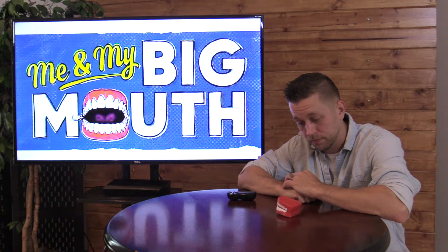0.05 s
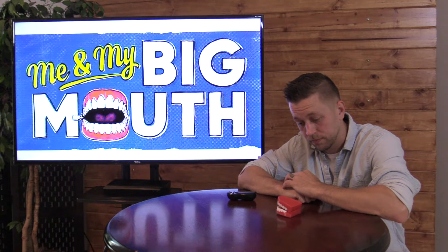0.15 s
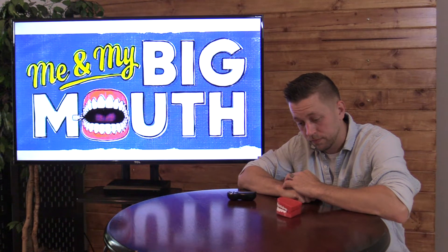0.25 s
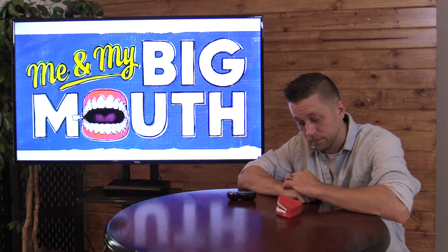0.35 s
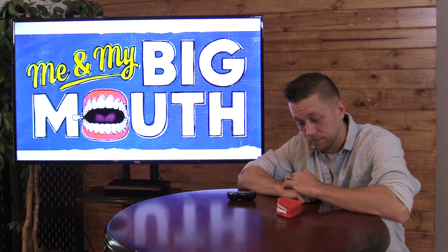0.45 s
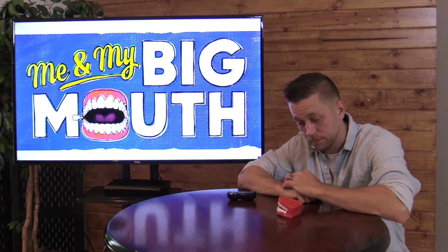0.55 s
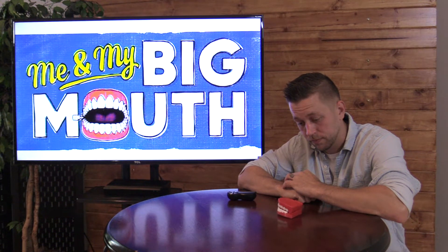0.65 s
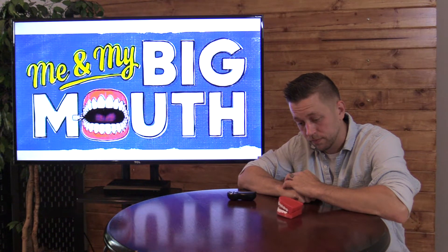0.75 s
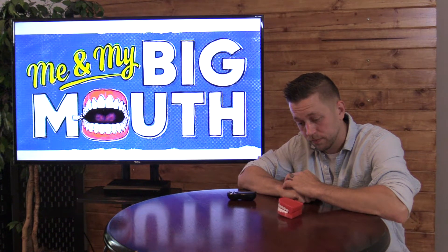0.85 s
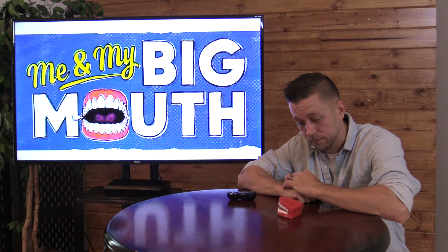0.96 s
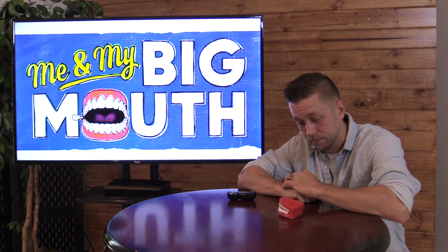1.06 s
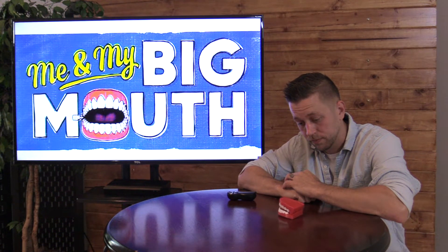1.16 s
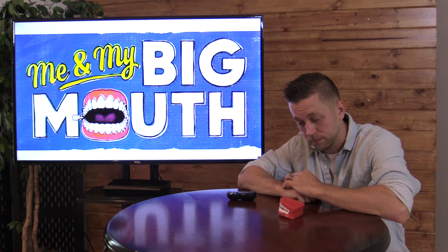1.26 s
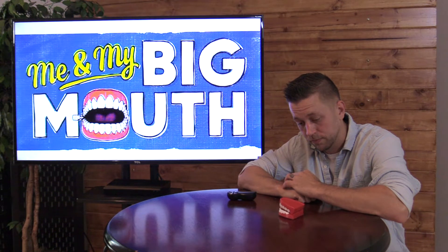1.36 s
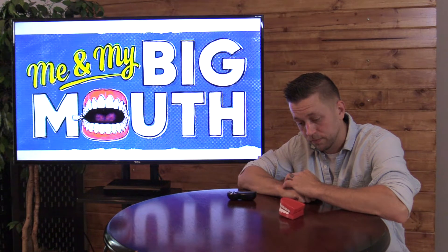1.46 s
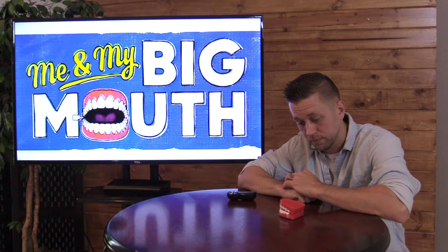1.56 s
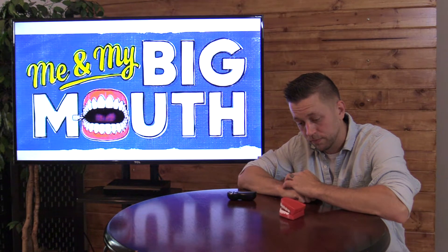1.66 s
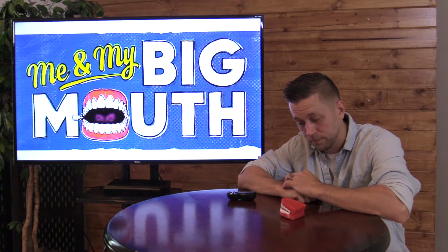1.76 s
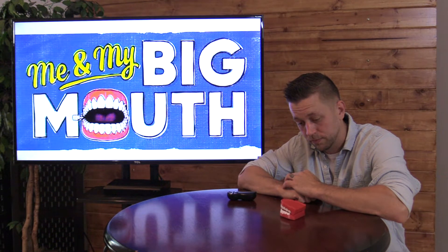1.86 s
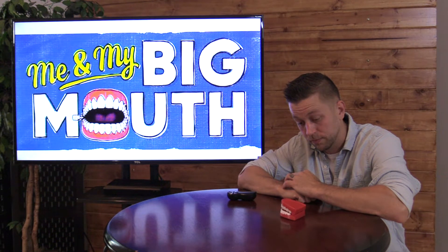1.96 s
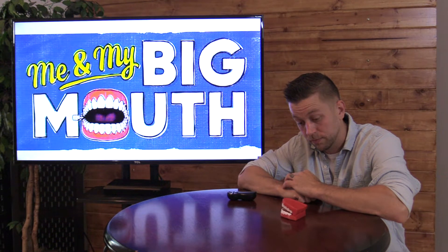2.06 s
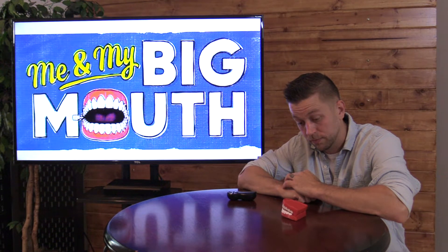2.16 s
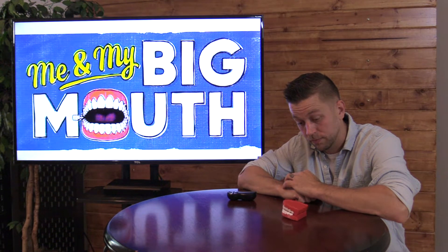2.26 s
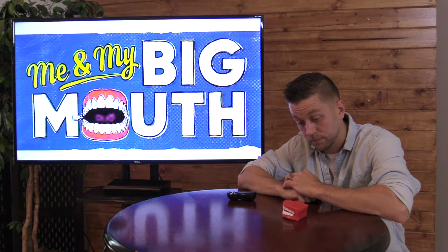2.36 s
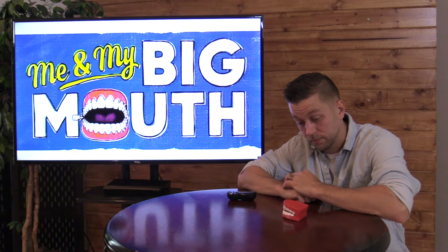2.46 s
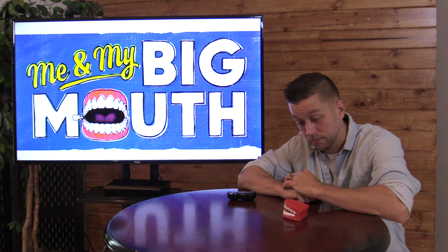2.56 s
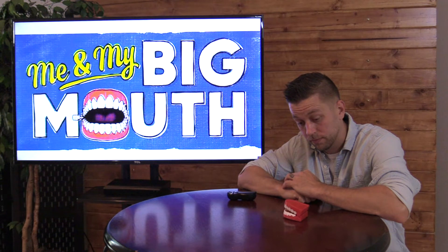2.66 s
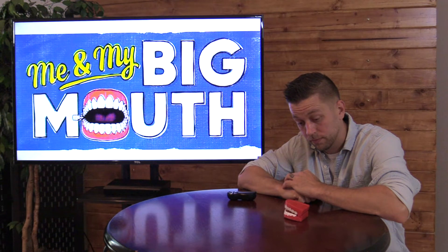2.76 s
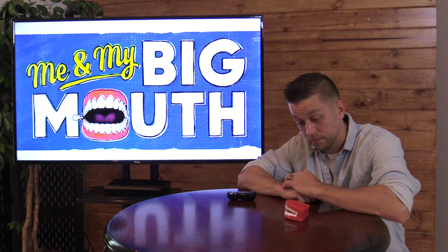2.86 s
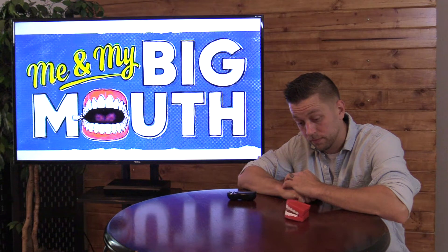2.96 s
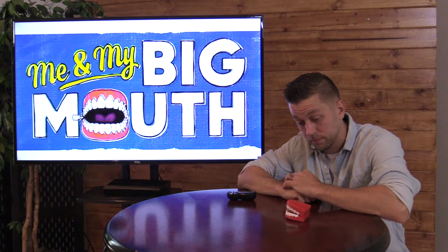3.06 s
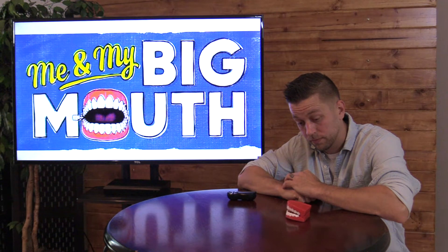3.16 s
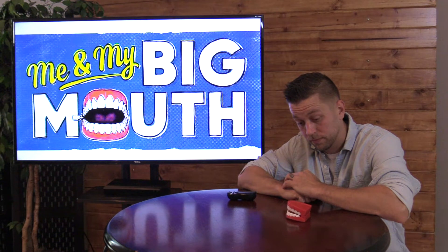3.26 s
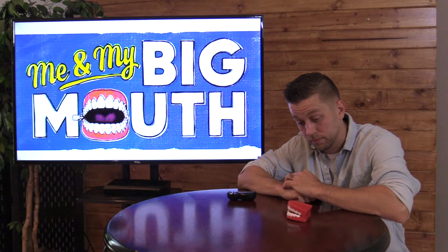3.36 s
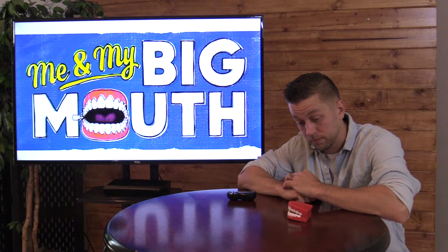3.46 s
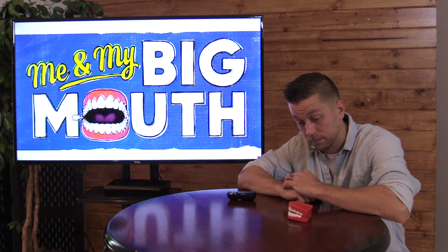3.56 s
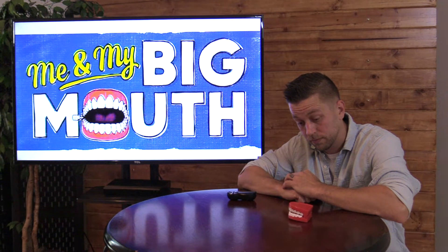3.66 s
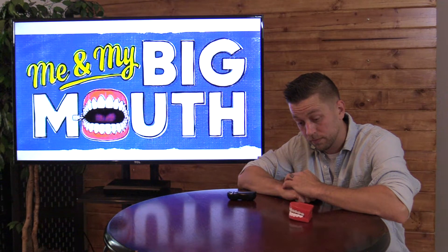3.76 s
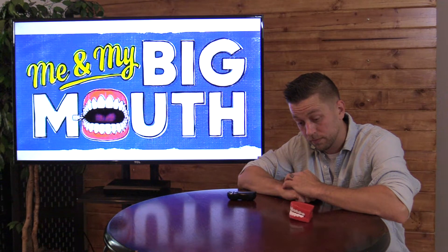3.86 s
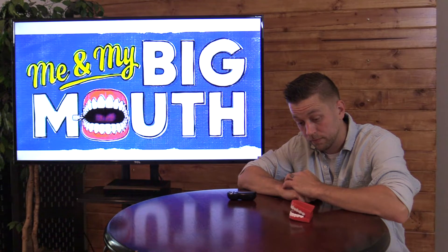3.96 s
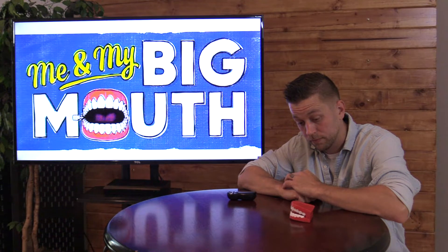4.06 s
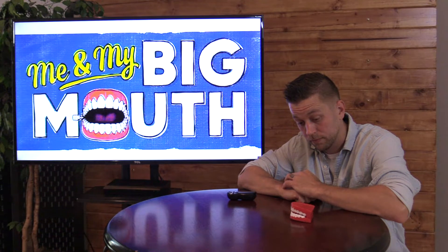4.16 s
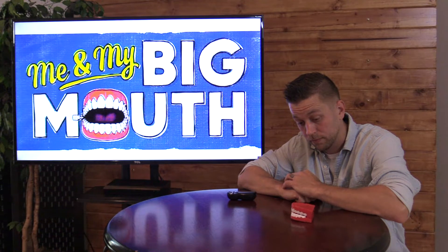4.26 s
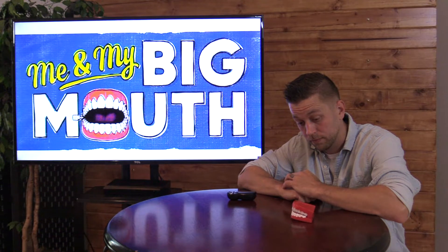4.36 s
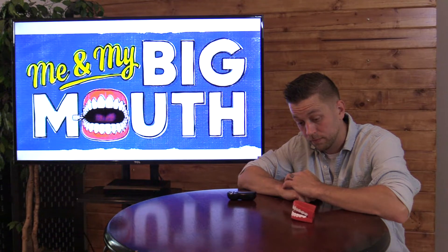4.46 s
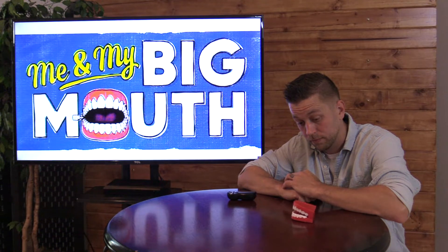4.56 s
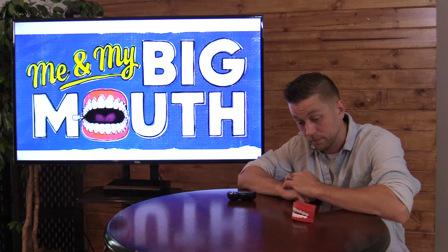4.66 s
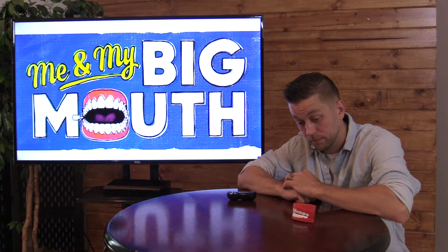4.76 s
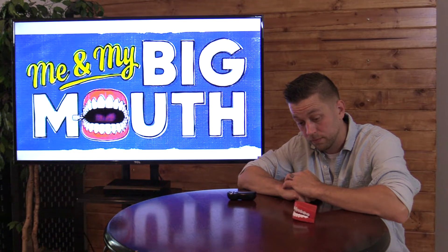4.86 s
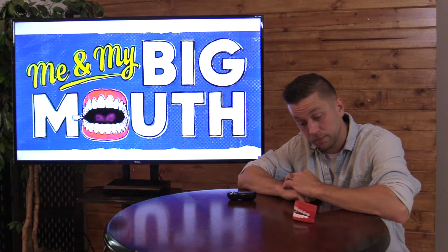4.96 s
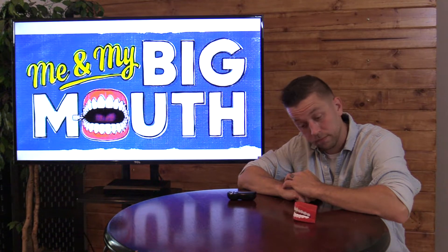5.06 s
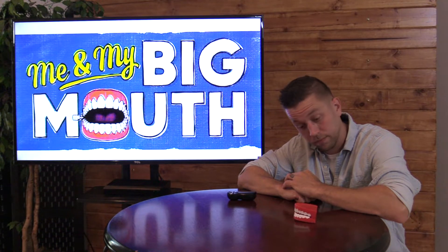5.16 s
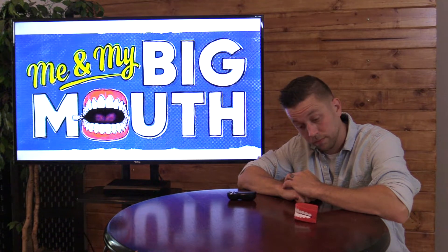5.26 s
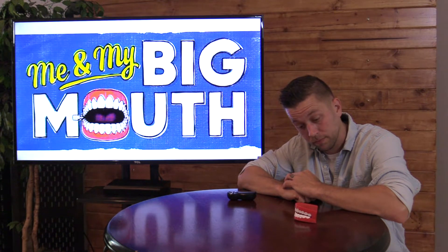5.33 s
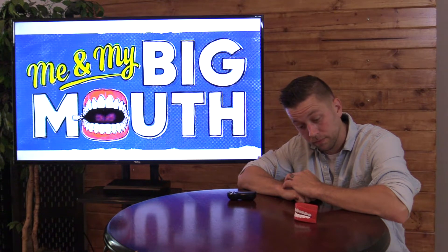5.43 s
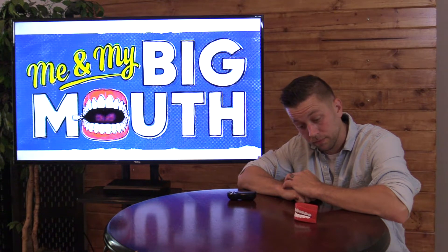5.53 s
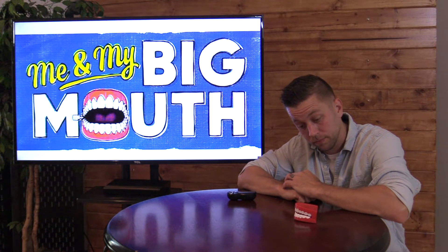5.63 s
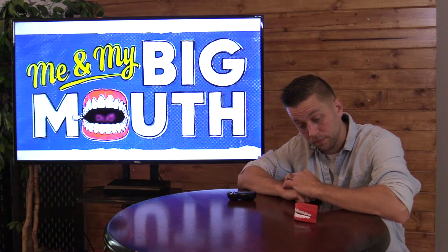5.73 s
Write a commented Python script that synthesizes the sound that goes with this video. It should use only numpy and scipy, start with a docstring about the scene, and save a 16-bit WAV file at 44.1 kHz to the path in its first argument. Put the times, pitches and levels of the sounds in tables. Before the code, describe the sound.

A small wind-up plastic jaw is already chattering on a wooden tabletop at 0 s, at around fifteen bites a second, a dense, brittle clatter. Every turn has the same pattern: a faint catch of the mechanism, a light scraping tick as the jaw slips, then about 15 ms later a sharp, hollow clack as the teeth bite shut, followed by a weak bounce on the table. The bites vary in force, some snappy, others duller with more woody thump. By 2 s the pace has dropped to about twelve a second; from 3 s it is near ten, the gaps opening and the slip ticks growing fainter. By 4 to 5.3 s it runs at about eight a second, each clack distinct, without coming to a full stop. The sound is close, midrange and bright with little bass; a large room answers quietly with a dull, blurred tail under one second long.

```python
"""Wind-up chattering jaw

A wind-up plastic jaw chatters on a wooden table, slower as its spring runs down. In each turn the cam catches
the jaw and lifts it, lets it slip, the teeth bite shut and the toy bounces. Noisy forces and clicks ring the
modes of shell and table top, with snaps and rustle heard directly; blurred, dying noise is the large room's
faint answer."""
import sys
import numpy as np
from scipy import signal
from scipy.fft import rfft, irfft, next_fast_len
from scipy.io import wavfile
from scipy.ndimage import uniform_filter1d

SR = 44100
rng = np.random.default_rng(int(sys.argv[2]) if len(sys.argv) > 2 else 0)


def digitize_waveform(pressure):
    """Quantize a signal to 16-bit integers and store it at the path in sys.argv[1].

    Rows of a 2-D input are taken as channels; values are limited to [-1, 1].
    """
    field = np.atleast_2d(pressure).T
    bounded = np.clip(field, -1, 1)
    quanta = np.round(bounded * 32767).astype(np.int16)
    wavfile.write(sys.argv[1], SR, quanta)


N = 255427
SIZE = 16384  # length of one contact with its ringing [samples]
T = np.arange(SIZE // 2) / SR  # time since a contact [s]


def amp(db):
    """Decibels to gain."""
    return 10 ** (np.asarray(db) / 20)


def along(points, hz):
    """Curve through (frequency [Hz], value) points on a log frequency axis."""
    f, v = np.transpose(points)
    return np.interp(np.log(hz + 1), np.log(f + 1), v)


def dying_noise(count, size, decays):
    """Rows of noise starting at rms 1, each frequency dying at its own speed."""
    hz, t, bins = signal.stft(rng.standard_normal((count, size)), SR, nperseg=128)
    fade = amp(-60 * t / along(decays, hz)[:, None])
    return signal.istft(bins * fade, SR, nperseg=128)[1][:, :size]


def filtered(x, response):
    """Filter x by a gain curve over frequency."""
    m = next_fast_len(N + SR // 2)
    return irfft(rfft(x, m) * response(np.fft.rfftfreq(m, 1 / SR)), m)[..., :N]


# decay of the large room: (frequency [Hz], time to fall 60 dB [s])
HALL_DECAY = [(150, .65), (400, .9), (1000, .78), (2800, .75), (7000, .55), (15000, .3)]
# tone of the room's answer: (frequency [Hz], level [dB])
HALL_COLOUR = [(100, -32.5), (200, -10.5), (330, -12.5), (500, -7.5), (1000, -1.5), (1600, -4), (2600, -10),
               (4000, -12), (7000, -32), (15000, -68.5)]


def hall(x):
    """The far walls hear the toy from all sides, its modes blurred, and answer late, dull and long."""
    blurred = np.abs(x) * rng.standard_normal(N)
    late = np.pad(blurred, (900, 0))  # about 20 ms
    tail = dying_noise(1, SR, HALL_DECAY)[0]
    wet = signal.fftconvolve(late, tail / np.linalg.norm(tail))[:N]
    return filtered(wet, lambda hz: amp(along(HALL_COLOUR, hz)))


def contact_gate():
    """Envelope of a contact: a 1.9 ms rise, then a 9 dB drop as a gate closes after about 84 ms."""
    close_s, blend_s = 0.084, 0.0055
    return amp(-9 / (1 + np.exp((close_s - T) / blend_s))) * np.clip(T / 0.0019, 0, 1) ** 2


# colour of the loose parts: (frequency [Hz], level [dB])
RUSTLE_COLOUR = [(300, -43.5), (1000, -21), (2500, 5.5), (3700, 5.5), (5200, -9), (7500, -6.5), (9500, -14),
                 (12000, -18.5), (15000, -20.5)]


def rustle(count, rustle_s, crack_db):
    """Loose parts: coloured noise, a bright crack and a rustle that each die away exponentially."""
    colour = amp(along(RUSTLE_COLOUR, np.fft.rfftfreq(len(T), 1 / SR)))
    noise = irfft(rfft(rng.standard_normal((count, len(T)))) * colour, len(T))
    fade = amp(-60 * T / rustle_s) + amp(crack_db - 60 * T / 0.027)
    return fade * contact_gate() * noise / noise.std()


# first knock of a contact and its quick repeats: (delay [s], level [dB])
KNOCKS = [(.0007, 0), (.0026, -6), (.0044, -8)]


def snaps(snap_db):
    """Hard parts knock: short 2.2 kHz pulses, their delays and levels scattered."""
    out = np.zeros((len(snap_db), 512))
    for delay, db in KNOCKS:
        late, louder = rng.standard_normal((2, len(snap_db), 1))
        u = T[:512] - delay * (1 + 0.074 * late)
        knock = -np.exp(-(u / .00024) ** 2) * np.cos(2 * np.pi * 2200 * u + .8)
        out += amp(snap_db[:, None] + db + 1.5 * louder) * knock
    return out


def repeated(rows):
    """Noise rows that share part of the first row, as the same parts meet each turn."""
    alike = .5  # share of the power that repeats
    return np.sqrt(alike) * rows[0] + np.sqrt(1 - alike) * rows[1:]


# shiver after a contact: (frequency [Hz], time to fall 60 dB [s])
SHIVER_DECAY = [(150, 0.053), (500, 0.16), (1500, 0.13), (4000, 0.073), (6000, 0.079), (8600, 0.047),
                (15000, 0.023)]


def contact_force(count, click_db, scrape_s, shiver_db):
    """Parts scrape and shiver against each other as dying noise, with one sharp click."""
    force = repeated(rng.standard_normal((count + 1, len(T)))) * amp(-60 * T / scrape_s)
    force += amp(shiver_db) * repeated(dying_noise(count + 1, len(T), SHIVER_DECAY))
    # the force comes in tiny uneven rattles, each under a millisecond long
    rattle_db = 3 * np.repeat(rng.standard_normal((count, len(T) // 32)), 32, axis=1)
    force *= contact_gate() * amp(rattle_db)
    force[:, 20] -= amp(click_db)
    return force


# modes of table top and shell: (frequency [Hz], width [Hz], bite level [dB], slip level [dB],
# catch level [dB], change from start to end as the toy turns away [dB])
BODY_MODES = [(130, 13, -41, -63.5, -52, -4), (241.3, 8.5, -25, -36.5, -22, -3),
              (361, 17, -20, -64.5, -37, -5.5), (431.8, 19, -14.5, -31, -30.5, -10.5),
              (518.8, 28, -12, -33, -20.5, 0), (586, 45.3, -8.5, -60, -33.5, -3),
              (731, 40.3, -11.5, -13, -25, 5), (803.4, 66, -12, -5.5, -20, 3),
              (1017, 85, -7.5, -16.5, -4, -3), (1177, 31, -1, -22, -3.5, -7.5),
              (1352, 113, -2.5, 0, -6.5, -1), (1584, 159, -5, 2, -3.5, 4), (1899, 82, -1, 2.5, 3, -2.5),
              (2146, 160, -3.5, -11, -6, -6), (2560, 233, -2.5, -11.5, -5.5, -4),
              (3074, 300, -8.5, -0.5, -0.5, -2), (3630, 280, -10.5, -1, -4.5, 4),
              (4027, 244, -14.5, -10.5, -4.5, 3.5), (4806, 144, -17.5, -2.5, -11.5, 4.5),
              (5550, 204, -15.5, -6, -9.5, -8.5), (5997, 110, -22.5, -10.5, -18.5, 5),
              (6410, 130, -23, -25, -17.5, -0.5), (6995, 150, -27, -10, -11, -12.5),
              (8474, 305, -27, -19.5, -34.5, 3.5), (10320, 310, -35.5, -16, -25, -9),
              (13150, 520, -46.5, -32, -16.5, -43), (13600, 910, -65, -20, -21.5, -10.5),
              (15000, 800, -51.5, -43, -27, -33.5)]


def body_ring(force, s, treble_db, thump_db, strength_db):
    """Shell and table top ring in damped modes under the force; each contact starts at rms 1."""
    hz, width, turn_db = np.array(BODY_MODES)[:, [0, 1, 5]].T
    # every contact lands a little differently, so the modes change strength
    landing_db = 1.5 * rng.standard_normal((len(s), len(hz)))
    mode_db = strength_db + np.outer(s * SR / N, turn_db) + landing_db
    mode_db += np.outer(treble_db, hz > 4400) + np.outer(thump_db, hz < 900)
    decay = np.exp(-np.pi * np.outer(width, T))
    rings = (width / SR)[:, None] * decay * np.sin(2 * np.pi * np.outer(hz, T))
    sign = (-1.) ** np.arange(len(hz))  # neighbouring modes swing in opposite senses
    body = (amp(mode_db) * sign) @ rings
    hits = irfft(rfft(force, SIZE) * rfft(body, SIZE), SIZE)
    return hits / np.sqrt(np.mean(hits[:, :260] ** 2, axis=1))[:, None]


def contacts(s, level_db, treble_db, thump_db, strength_db, snap_db, click_db, scrape_s, shiver_db,
             rustle_db, rustle_s, crack_db):
    """A snap and a rustle heard directly, plus a click, a scrape and a shiver heard through the modes."""
    force = contact_force(len(s), click_db, scrape_s, shiver_db)
    hits = body_ring(force, s, treble_db, thump_db, strength_db)
    hits[:, :len(T)] += amp(rustle_db + treble_db)[:, None] * rustle(len(s), rustle_s, crack_db)
    hits[:, :512] += snaps(np.broadcast_to(snap_db, len(s)))
    out = np.zeros(N + SIZE)
    for start, gain, hit in zip(np.round(s * SR).astype(int), amp(level_db), hits):
        out[start:start + SIZE] += gain * hit
    return out[:N]


def spring_halvings():
    """How far the spring has run down at each turn: halvings of the full speed, 15 turns a second."""
    turn_s = np.gradient(np.transpose(BITES)[0])
    return np.log2(15 * uniform_filter1d(turn_s, size=5))


def treble(full_speed_db, loss_db, level_db):
    """Treble over the contact level: it shifts with each halving of the speed and scatters by 1 dB."""
    halvings = spring_halvings()
    return full_speed_db - loss_db * halvings + rng.standard_normal(len(halvings)) - level_db


# further bounces outside the regular rebound: (time [s], level [dB])
EXTRA_BOUNCES = [(0.0127, -36), (0.2591, -24), (2.215, -28.5), (3.0033, -24), (3.1954, -27), (3.212, -28.5),
                 (4.0957, -39), (4.8215, -33)]


def bounces():
    """The toy rebounds about 16 ms after each bite, with further bounces outside the regular rebound."""
    bite_s, _, _, _, rebound_db = np.transpose(BITES)
    extra_s, extra_db = np.transpose(EXTRA_BOUNCES)
    rebound_s = bite_s + 0.016 + 0.0015 * rng.standard_normal(len(bite_s))
    s = np.append(rebound_s, extra_s)
    level_db = np.append(rebound_db, extra_db)
    return contacts(s, level_db, treble_db=np.full(len(s), -5.), thump_db=np.full(len(s), 1.5),
                    strength_db=np.array(BODY_MODES)[:, 2], snap_db=10.0, click_db=12.5, scrape_s=0.027,
                    shiver_db=-7.0, rustle_db=-24.0, rustle_s=0.052, crack_db=6.0)


# the cam lets the jaw slip after catching and lifting it:
# (slip time [s], slip level [dB], catch level [dB])
SLIPS = [(0.0287, -16.5, -19.5), (0.087, -20.5, -22), (0.146, -21, -21.0), (0.2184, -18.5, -21.5),
         (0.2746, -20, -23.5), (0.3297, -20, -22), (0.3977, -21, -25.5), (0.4623, -19.5, -26.0),
         (0.5299, -17.5, -22.5), (0.5951, -19.5, -17.5), (0.657, -17.5, -30.5), (0.7302, -23.5, -22),
         (0.8016, -20.5, -26.0), (0.8723, -22, -22), (0.939, -22, -28), (1.0082, -18.5, -26),
         (1.078, -23, -20), (1.1487, -21.5, -21.5), (1.2155, -20, -19.5), (1.283, -23.5, -23.0),
         (1.3512, -22.5, -21.5), (1.4183, -20, -29.5), (1.4854, -21, -25.5), (1.5491, -23.5, -22.5),
         (1.6235, -20.5, -23.5), (1.7028, -22, -28.5), (1.7766, -21.5, -29.5), (1.851, -23.5, -25),
         (1.9234, -21, -25.5), (2.002, -21, -28), (2.0909, -23.5, -33), (2.1752, -26, -29),
         (2.25, -23, -27.5), (2.342, -24, -32), (2.4267, -22.5, -24), (2.5112, -27, -28),
         (2.599, -21.5, -27), (2.6855, -26, -30.5), (2.7844, -28.5, -37), (2.8915, -25, -38.5),
         (2.991, -26, -36), (3.0808, -23, -28.5), (3.184, -24.5, -37), (3.2949, -30.5, -38),
         (3.3975, -26, -37), (3.495, -21, -36.5), (3.606, -25, -47.5), (3.7253, -24.5, -41.5),
         (3.8357, -22.5, -36.5), (3.9469, -25, -40), (4.0554, -27, -49.5), (4.174, -23, -36.5),
         (4.3083, -26, -41.5), (4.4264, -23.5, -37.0), (4.5393, -30.5, -36.5), (4.6633, -24, -38.5),
         (4.787, -34.5, -42), (4.935, -36, -47), (5.0663, -27, -38), (5.1818, -22.5, -35.0),
         (5.3243, -24, -49)]


def catches():
    """The cam catches the jaw ahead of each slip; the lift takes longer as the spring runs down."""
    slip_s, _, level_db = np.transpose(SLIPS)
    lift_s = 0.0265 + 0.0032 * spring_halvings()
    catch_s = np.abs(slip_s - lift_s)  # never before the start
    return contacts(catch_s, level_db, treble(-23, 9, level_db), thump_db=np.zeros(len(catch_s)),
                    strength_db=np.array(BODY_MODES)[:, 4], snap_db=-14, click_db=13, scrape_s=0.033,
                    shiver_db=-8.5, rustle_db=-9.5, rustle_s=0.13, crack_db=6.0)


def slips():
    """The jaw slips off the cam with a short rustle; the faintest slips lose treble too."""
    slip_s, level_db, _ = np.transpose(SLIPS)
    treble_db = treble(-22, -2, np.maximum(level_db, -25))
    return contacts(slip_s, level_db, treble_db, thump_db=np.zeros(len(slip_s)),
                    strength_db=np.array(BODY_MODES)[:, 3], snap_db=-0.5, click_db=17.0, scrape_s=0.019,
                    shiver_db=-7.0, rustle_db=-8.5, rustle_s=0.012, crack_db=9.0)


# teeth bite shut and the toy rebounds: (bite time [s], ring level [dB], snap level [dB],
# table thump over the ring [dB], rebound level [dB])
BITES = [(0.0437, -16, -15, -14.5, -28.5), (0.101, -18.0, -0.5, 3, -25), (0.1598, -19, -9.5, 9, -27.5),
         (0.2326, -16.5, -1.5, 8, -26), (0.2919, -19, 0, 11.5, -25.5), (0.3423, -15, -3.0, 3, -24),
         (0.4109, -14.5, -9.5, 5.0, -28.5), (0.4755, -17.0, -1, 8, -41), (0.542, -16.5, -9.5, 4.5, -39.5),
         (0.6104, -17, -1.5, 6.5, -22.5), (0.6692, -15.5, -11.5, 1.0, -28.5),
         (0.7431, -14.5, -1.5, 6.0, -23), (0.815, -14.0, -6, 5.0, -24.5), (0.8862, -17, -1, 6.5, -19),
         (0.9536, -16.0, 1, 5.5, -22.5), (1.0216, -17.5, -1, -0.5, -40.5),
         (1.091, -14.0, -10.5, 3.5, -22.5), (1.1612, -15, -3.5, 4.5, -28.5), (1.2285, -13.5, -22, 1.0, -29),
         (1.2968, -15.5, -3.5, 5.5, -24), (1.3644, -13.5, -4.0, 4, -24), (1.4321, -14.0, -5.5, 3, -22.5),
         (1.4994, -16, -1, 7, -17.5), (1.5613, -13, -10, 3.5, -25.5), (1.6368, -17, -4, 4.5, -25),
         (1.7163, -14.5, -2.5, 3, -22), (1.7887, -14, -4, -1.5, -24.5), (1.8646, -12.0, -6.5, -1.0, -22.5),
         (1.9354, -15, 1, 0.5, -23.5), (2.0148, -19, -14, -9.0, -30), (2.1044, -17, -6, 5.5, -28),
         (2.1888, -12.5, -1.0, 2, -31), (2.2603, -16.0, -9, 3, -32), (2.3553, -16.0, 1, 9.5, -18.5),
         (2.4364, -16, -9, -1, -21), (2.5236, -16, -15, 3, -31), (2.6109, -15.5, -22, 0.5, -26),
         (2.6966, -14.0, -6.5, 4, -25), (2.795, -15.5, -9, 5.5, -35), (2.9016, -14.5, -2, 6, -31.5),
         (3.0123, -16.5, -11, 8, -25.5), (3.093, -15, -1.5, -1, -28), (3.205, -22.5, -21, 11.5, -28.5),
         (3.3048, -14.5, -12, -17, -25.5), (3.4085, -14.5, -8.5, -1, -27.5), (3.5073, -15, -3.5, 3.5, -30),
         (3.6186, -17, -5.5, -13.5, -26.5), (3.7343, -13.5, -4, 2.5, -32), (3.8455, -19, -4.5, -6, -24),
         (3.9577, -14, -4, 4.0, -33), (4.064, -14.5, -14, -4.5, -26), (4.184, -15, -8.5, -5.5, -22.5),
         (4.3172, -15.5, -2.0, 8.5, -27.5), (4.437, -13, -7, 0, -27.5), (4.55, -15.5, -6.5, 0.5, -26.5),
         (4.672, -16.0, -6, 7.5, -32), (4.7946, -16.5, 1, 10, -31.5), (4.9435, -15, -7, 5.5, -28),
         (5.0755, -15, -12, 1.5, -29), (5.1905, -14.5, -3, 5, -27.5), (5.333, -15.5, -4.0, 3.5, -27.5)]


def bites():
    """The teeth snap shut and set shell and table ringing, with a table thump of its own strength."""
    bite_s, ring_db, snap_db, thump_db, _ = np.transpose(BITES)
    return contacts(bite_s, ring_db, treble(-11, 2.5, ring_db), thump_db,
                    strength_db=np.array(BODY_MODES)[:, 2], snap_db=snap_db - ring_db,
                    click_db=18.0, scrape_s=0.022,
                    shiver_db=-7.0, rustle_db=-27.0, rustle_s=0.23, crack_db=20.5)


def scene():
    """The toy close by and the room behind it."""
    toy = bounces() + catches() + slips() + bites()
    return (toy + amp(-14.5) * hall(toy))[None]


# bass response: (frequency [Hz], level [dB])
BASS_RESPONSE = [(60, -14.5), (110, -0.5), (165, -7), (205, -9.5), (245, 0)]


def record(dry):
    """The bass is thin, peaks are rounded off and nothing above the band limit is kept."""
    top_hz = 16400
    thin = signal.sosfilt(signal.butter(2, 220, "high", fs=SR, output="sos"), dry)
    soft = thin / (1 + np.abs(thin) ** 8) ** (1 / 8)

    def response(hz):
        return amp(along(BASS_RESPONSE, hz)) * np.clip((top_hz - hz) / 1500, 0, 1) ** 2

    return filtered(soft, response)


dry = scene()
out = record(dry)
digitize_waveform(out)
```